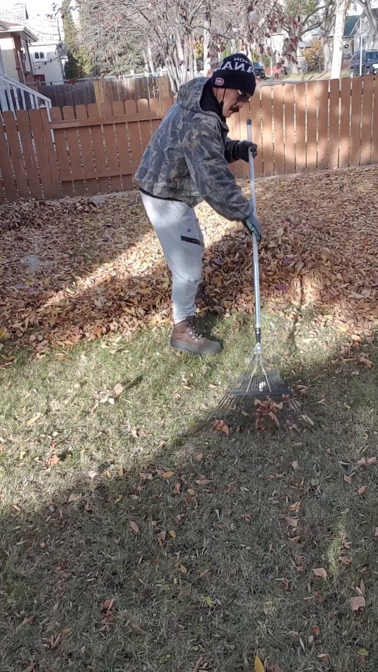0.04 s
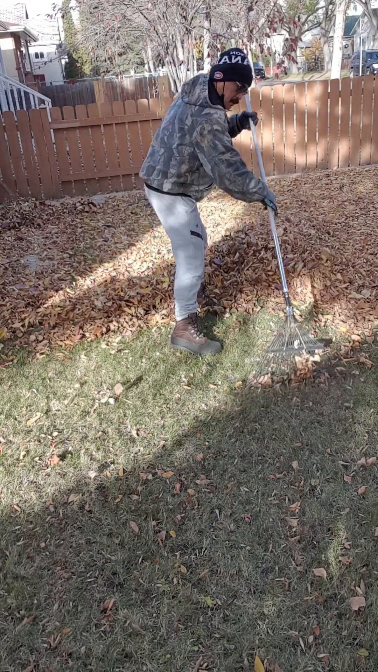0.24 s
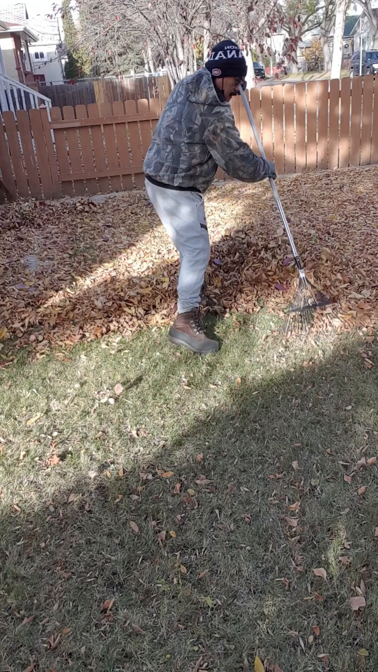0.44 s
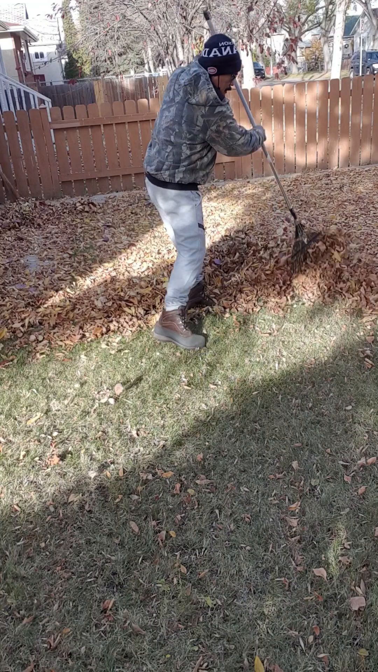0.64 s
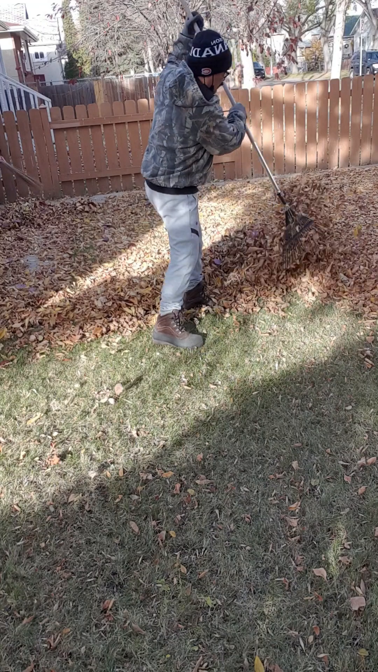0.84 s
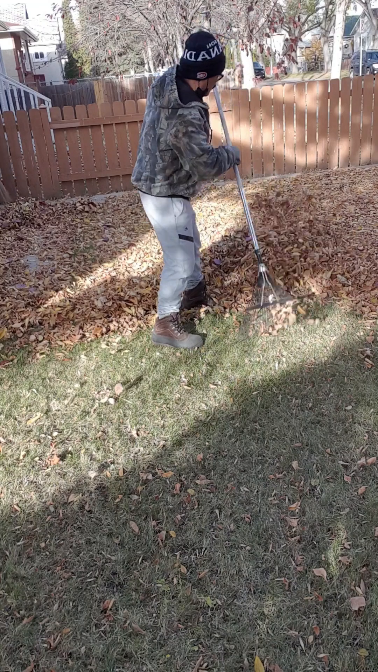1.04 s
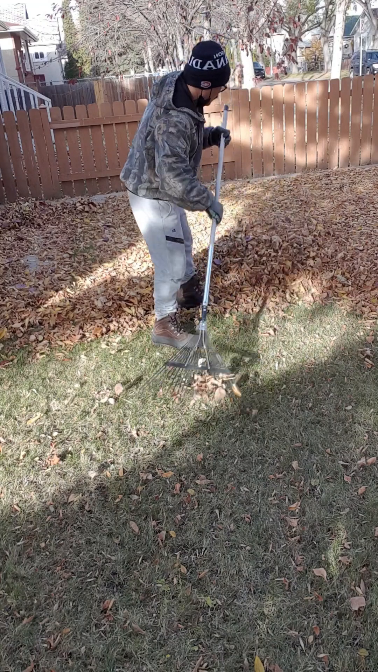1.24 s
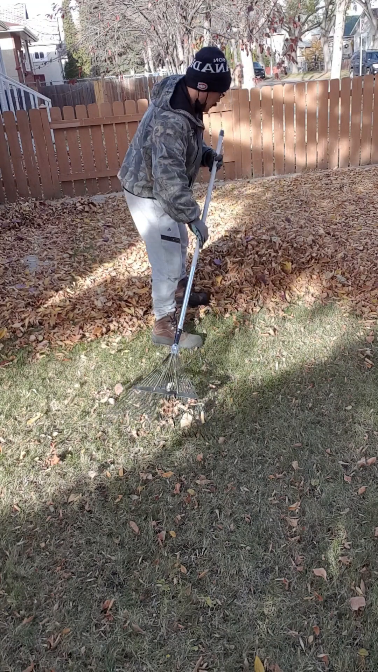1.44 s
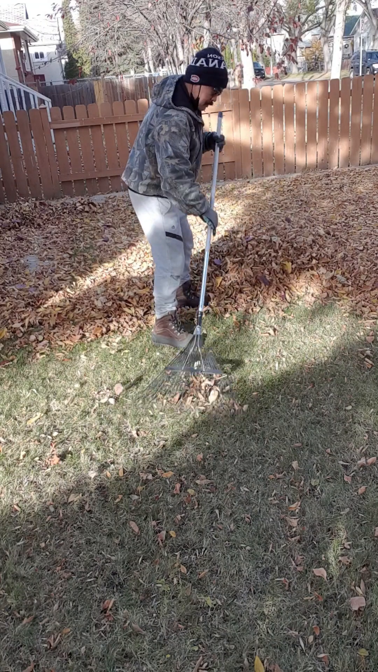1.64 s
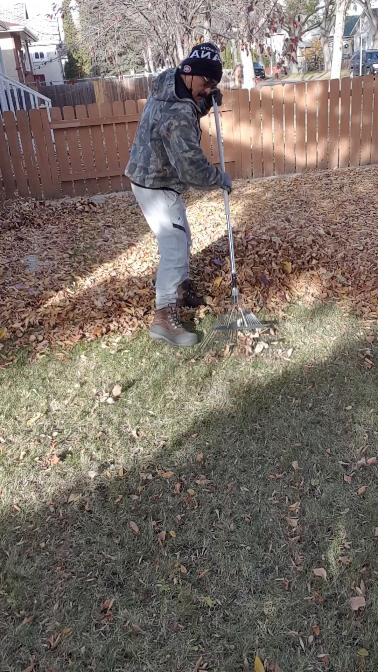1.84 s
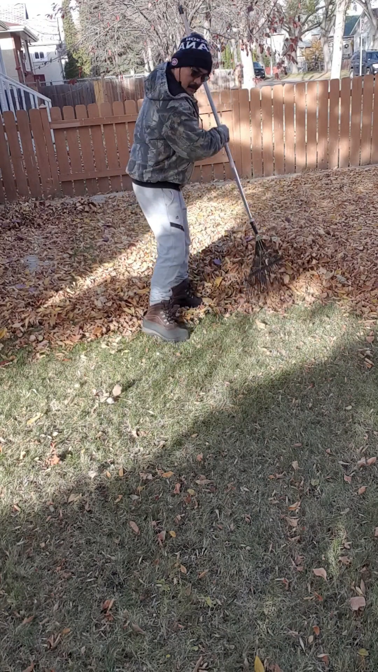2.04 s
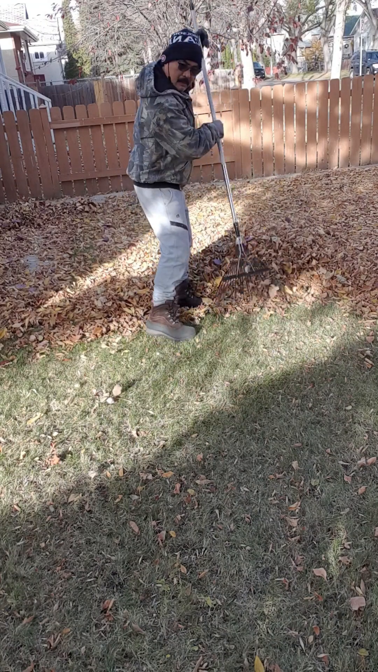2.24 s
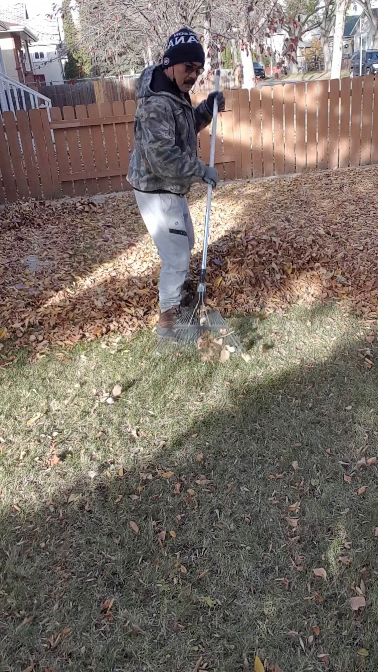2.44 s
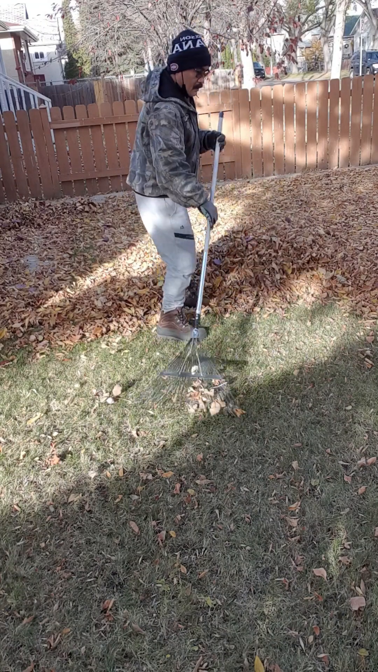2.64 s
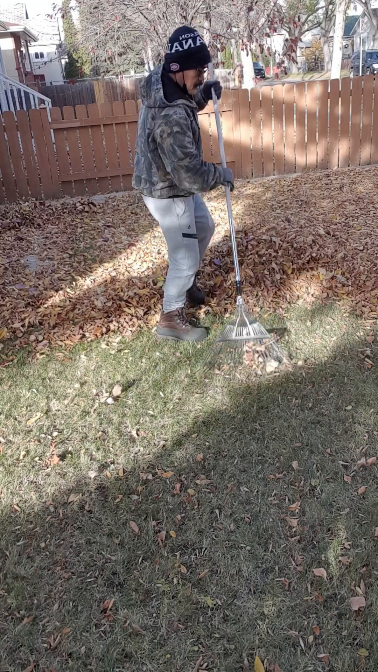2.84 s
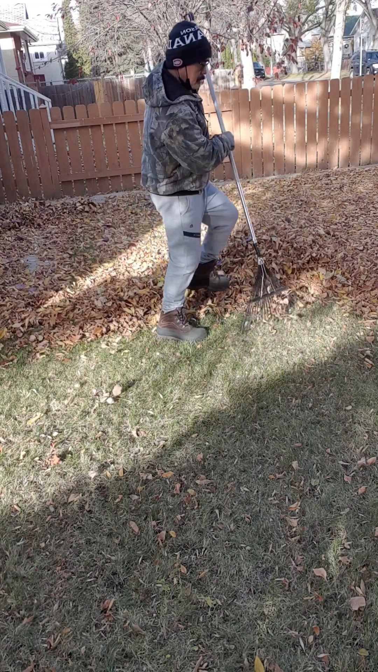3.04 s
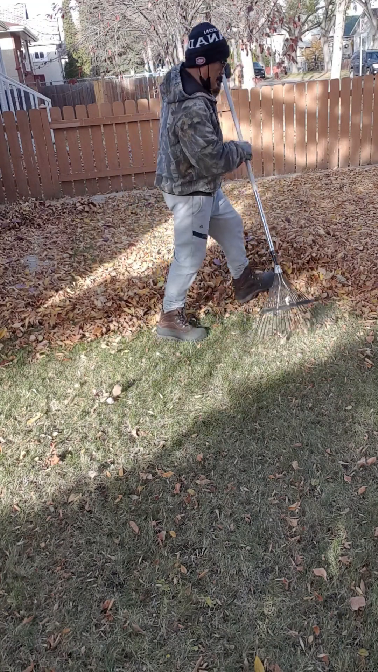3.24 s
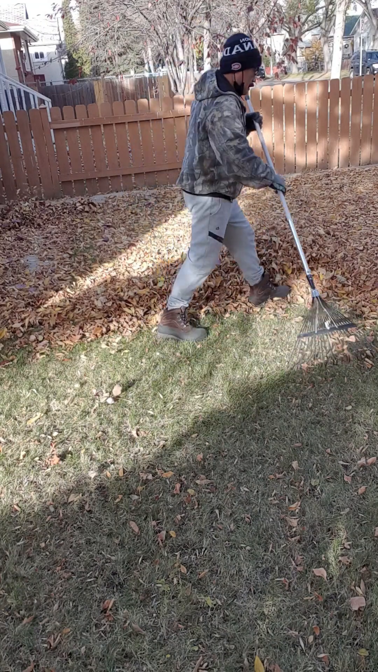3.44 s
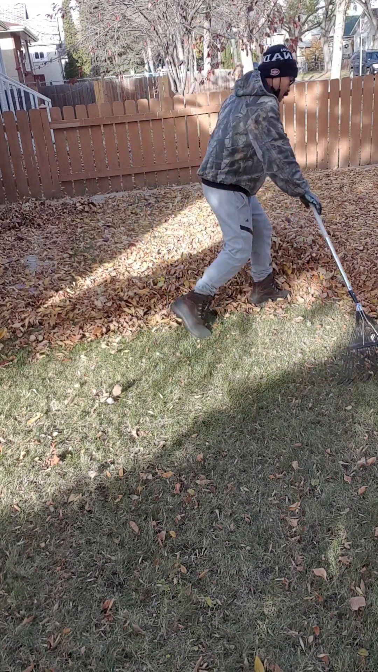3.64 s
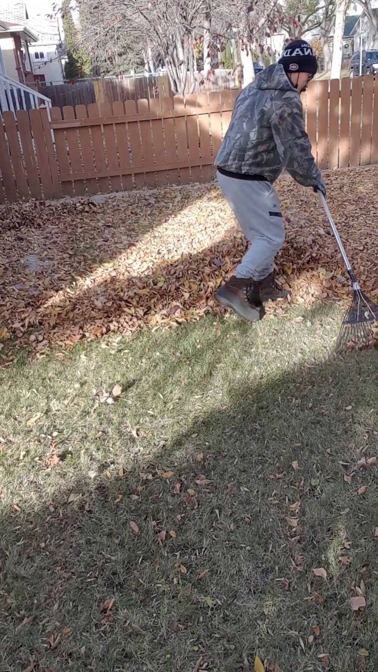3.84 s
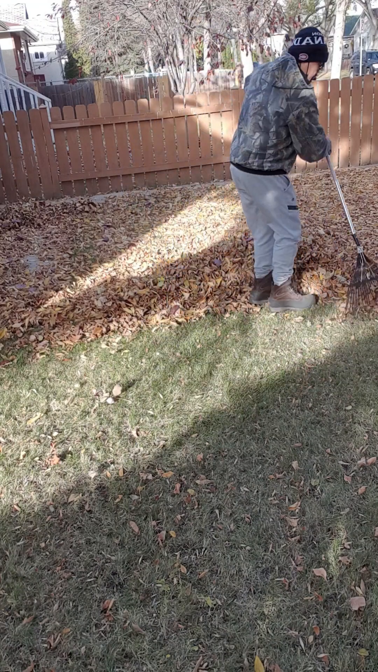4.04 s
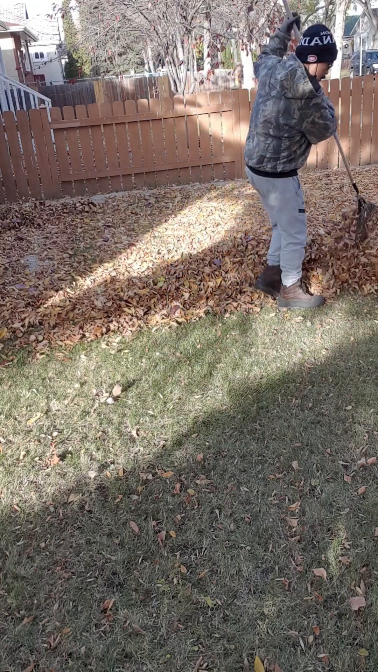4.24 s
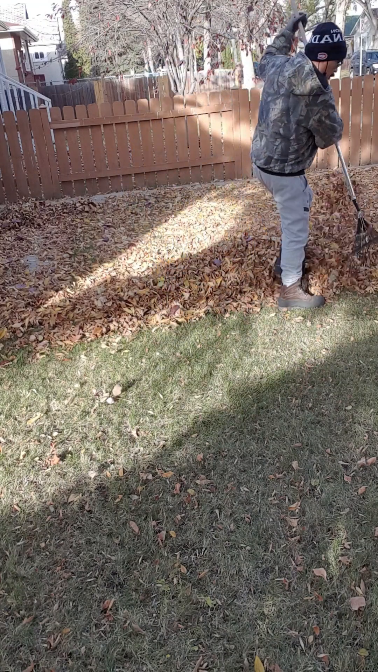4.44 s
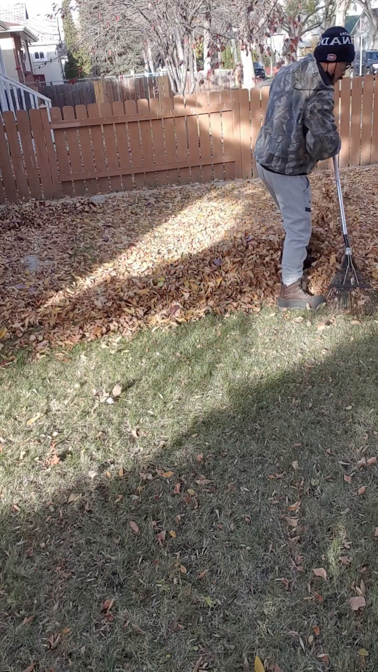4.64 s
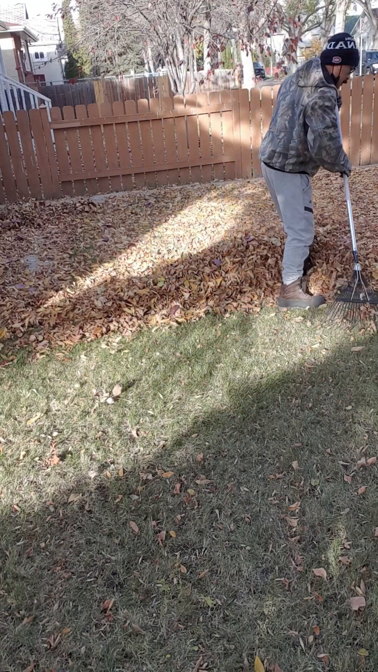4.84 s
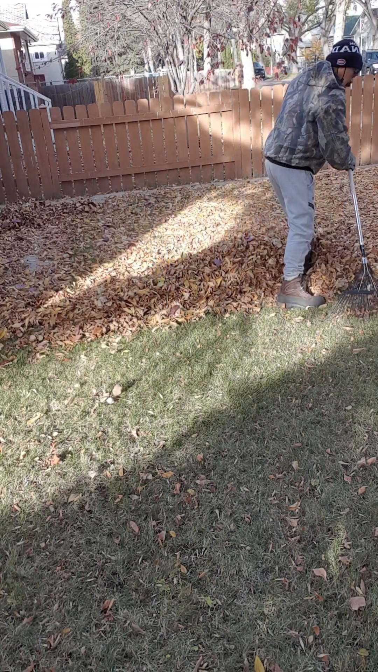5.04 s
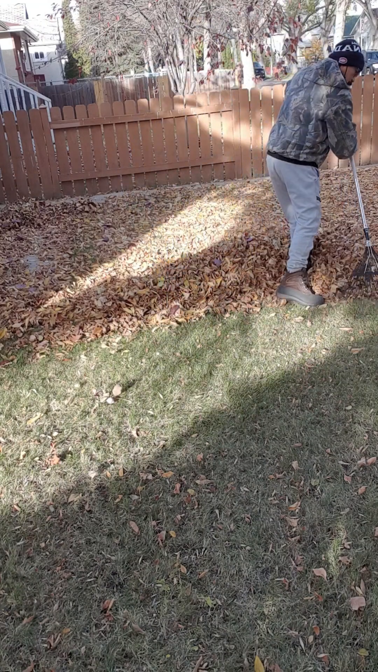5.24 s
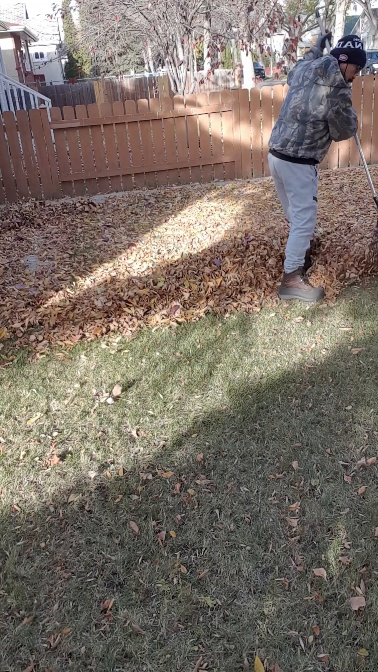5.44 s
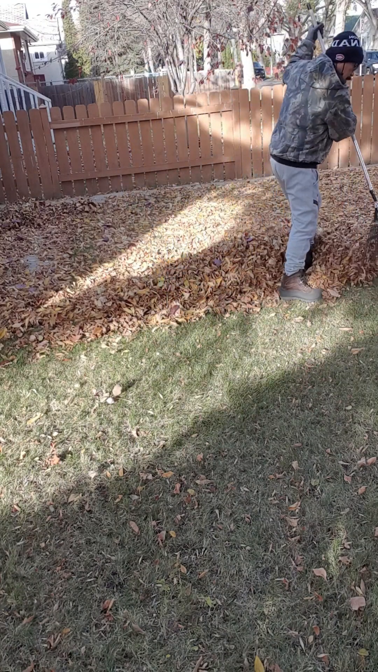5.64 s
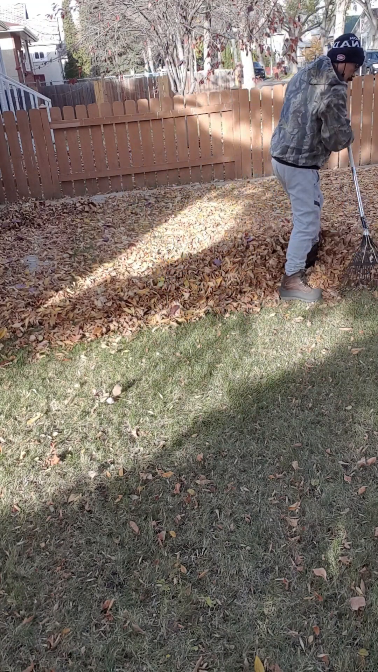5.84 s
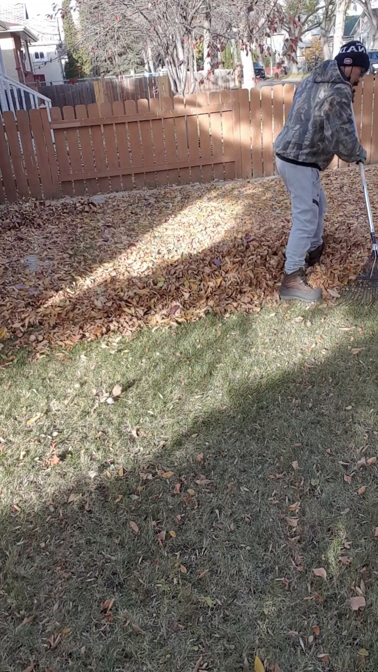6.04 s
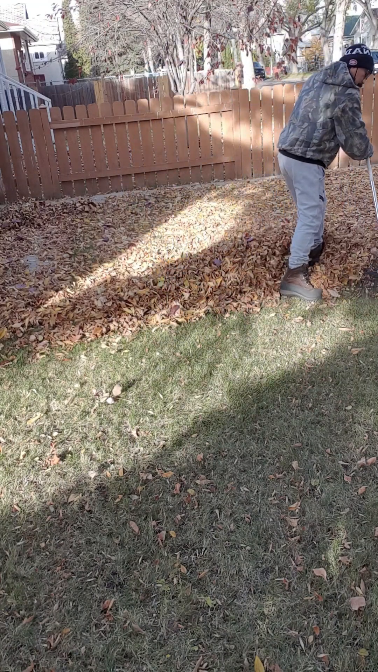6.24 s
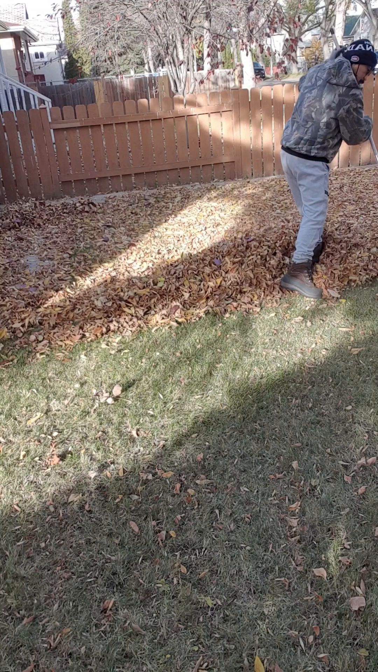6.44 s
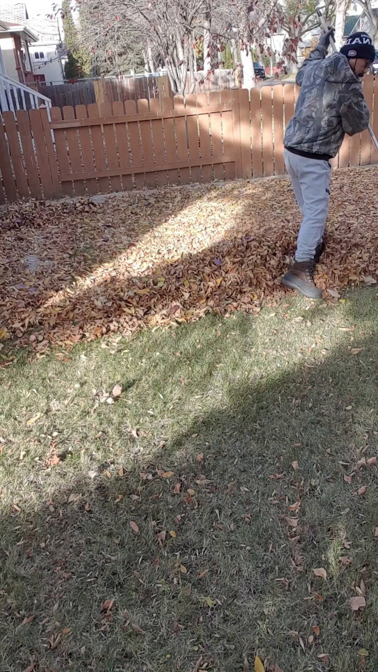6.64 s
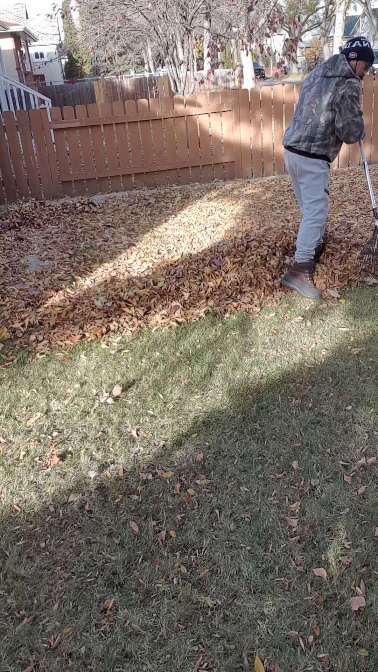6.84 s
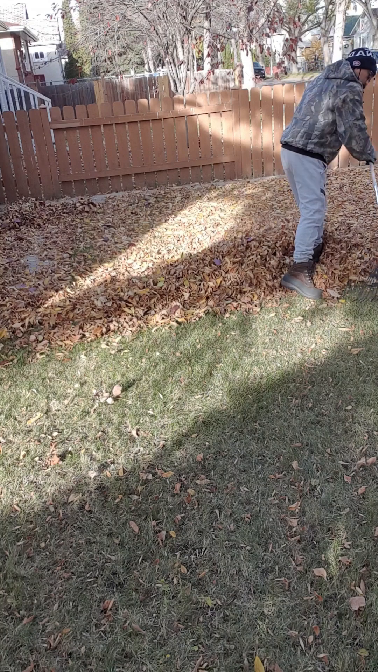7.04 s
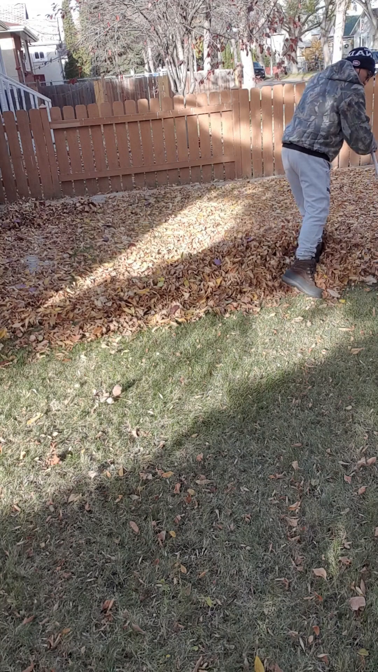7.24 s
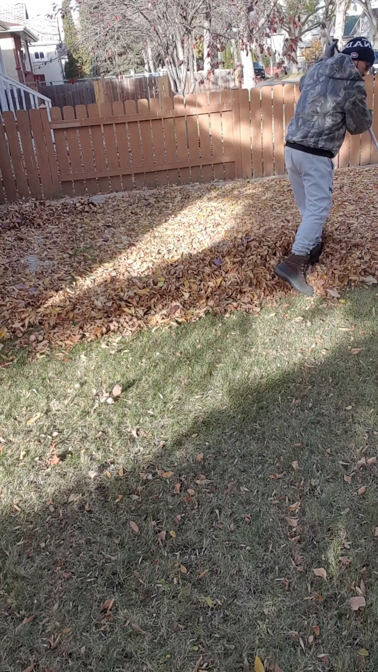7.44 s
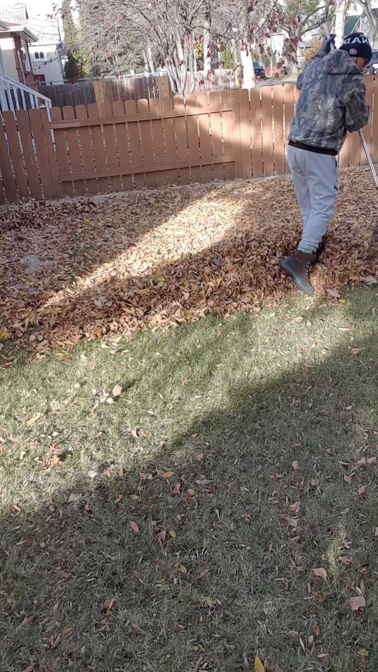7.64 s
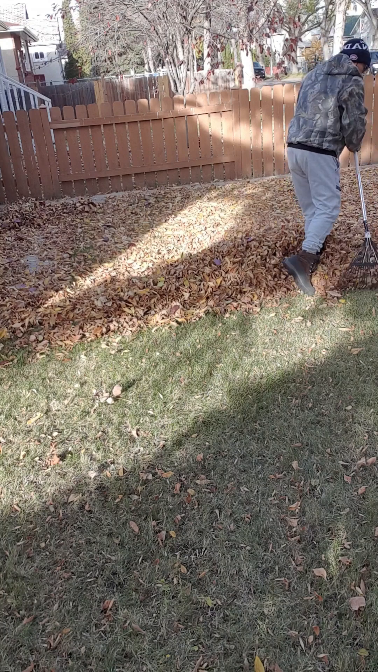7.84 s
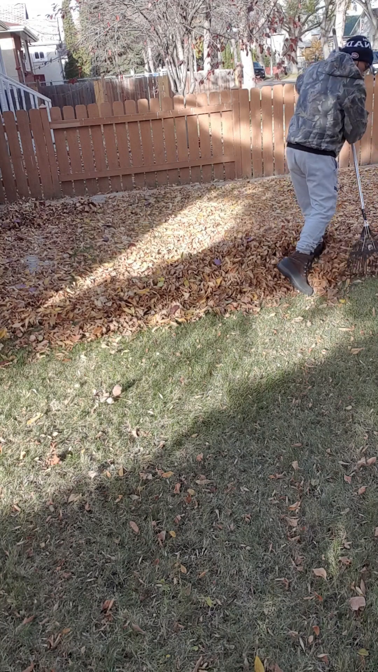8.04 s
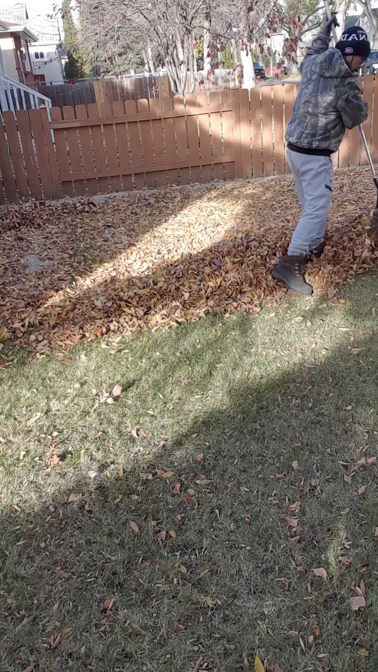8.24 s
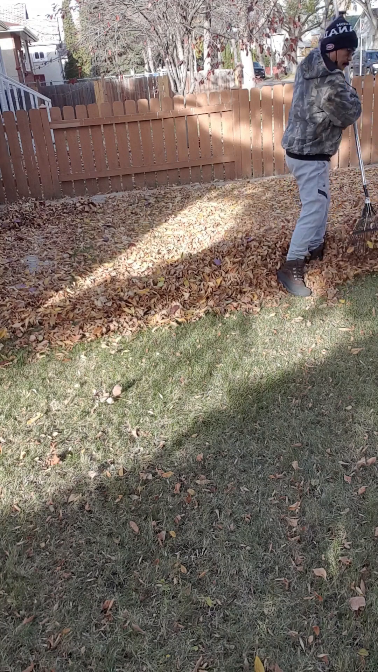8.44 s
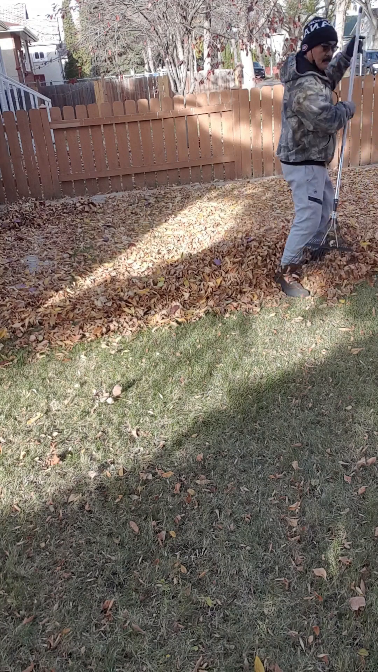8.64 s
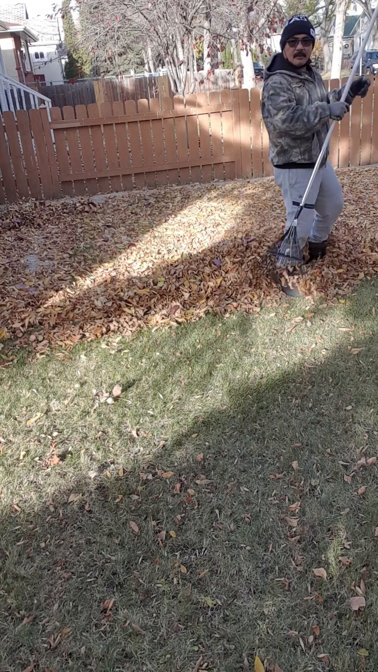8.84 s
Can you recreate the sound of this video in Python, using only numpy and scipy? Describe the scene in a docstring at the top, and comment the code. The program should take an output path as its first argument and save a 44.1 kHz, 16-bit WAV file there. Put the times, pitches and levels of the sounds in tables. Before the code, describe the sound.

A rake bites at once into brittle leaves on a lawn, and the strokes continue to the end. Bright crackling swishes swell and fade, the biggest early and again just before the middle. Springy tines snap and the rake knocks lightly on the turf. Later strokes are shorter and closer together. Distant low rumble and faint open air sit underneath, heard by a stereo microphone nearby with little echo.

```python
"""A dry rustle bites in at once: a fan rake dragged again and again through brittle leaves on a lawn.
Each stroke is shaped noise, random snaps and ringing stalks; loose leaves swell and settle between strokes.
Tines flick with noise cracks and sprays, and knocks ring the rake's decaying modes.
A low rumble of noise and a wavering drone lies far behind, with faint outdoor air."""
import sys
import numpy as np
from scipy import signal
from scipy.fft import rfft, irfft
from scipy.io import wavfile
from scipy.ndimage import uniform_filter1d, map_coordinates

SR = 44100
rng = np.random.default_rng(int(sys.argv[2]) if len(sys.argv) > 2 else 0)


def store_wav(level_fs):
    """Save 16-bit WAV to argv[1]."""
    pcm = np.round(np.clip(np.atleast_2d(level_fs), -1, 1) * 32767)
    wavfile.write(sys.argv[1], SR, pcm.T.astype(np.int16))


N = 392490


def from_db(db):
    """Decibels to gain."""
    return 10 ** (np.asarray(db) / 20)


def rms_one(x):
    """Scale to rms 1."""
    return x / np.sqrt(np.mean(x ** 2) + 1e-20)


def in_time(rows):
    """Draw the columns of a curve, first column time, at every sample."""
    s, *columns = np.transpose(rows)
    return [np.interp(np.arange(N) / SR, s, column) for column in columns]


def colour(x, points, size=8192):
    """Causal (minimum-phase) filter with the given spectrum."""
    hz, db = np.transpose(points)
    grid = np.maximum(np.fft.rfftfreq(size, 1 / SR), 1)
    gain = from_db(np.interp(np.log(grid), np.log(hz), db))
    # folding the cepstrum onto positive time gives minimum phase
    cepstrum = irfft(np.log(gain))
    cepstrum[1:size // 2] *= 2
    cepstrum[size // 2 + 1:] = 0
    impulse = irfft(np.exp(rfft(cepstrum)))
    return signal.oaconvolve(x, impulse[None], axes=-1)[:, :N]


def drift(rate):
    """Smooth chance that heads for a new value rate times a second; rms 1."""
    knots = rng.standard_normal(N // 16)
    return rms_one(np.interp(np.arange(N) / SR * rate, np.arange(len(knots)), knots))


def white_pair(direct):
    """White stereo noise: a direct share of power is alike on both sides, ground and fence scatter the rest."""
    alike = np.sqrt(direct) * rng.standard_normal(N)
    return alike + np.sqrt(1 - direct) * rng.standard_normal((2, N))


def fade(clicks, t60):
    """Every click of energy dies away exponentially, by 60 dB in t60 seconds."""
    return signal.lfilter([1], [1, -from_db(-120 / (t60 * SR))], clicks + 1e-18)


def ring(drive, hz, t60):
    """A damped resonance: a unit click sets a decaying sine of height about 1 ringing."""
    radius, angle = from_db(-60 / (t60 * SR)), 2 * np.pi * hz / SR
    feedback = [1, -2 * radius * np.cos(angle), radius * radius]
    return signal.lfilter([0, np.sin(angle)], feedback, drive + 1e-18)


def snaps(per_s, spread_db, t60, largest=1.9):
    """Energy of leaves breaking at random: many tiny snaps and a few large ones; mean 1."""
    born = rng.random(N) < per_s / SR
    sizes = from_db(spread_db * np.minimum(rng.exponential(1, N), largest))
    energy = fade(born * sizes ** 2 / per_s, t60)
    return energy / energy.mean()


def grains(energy, spectrum, sliding, direct):
    """Snaps as tiny noise bursts over a smooth share of leaves sliding on each other; rms 1."""
    envelope = np.sqrt(sliding + (1 - sliding) * energy)
    return rms_one(colour(envelope * white_pair(direct), spectrum))


# colour of the outdoor air: (frequency [Hz], relative level [dB per Hz])
AIR_COLOUR = [(100, 12), (300, -4.5), (700, -10), (1300, -37), (3000, -13), (8000, -2.5), (16000, -12)]


def air():
    """Faint, constant outdoor air: coloured noise about half alike on both sides."""
    return from_db(-48.5) * rms_one(colour(white_pair(direct=0.52), AIR_COLOUR))


# level of the rumble, with one sudden drop: (time [s], level before trim [dB])
RUMBLE_LEVEL = [(0.0, -32), (0.25, -29), (0.88, -34), (1.02, -32.5), (1.6, -31), (1.96, -33.5), (2.2, -33),
                (3.3, -31.5), (4.2, -33), (4.98, -32), (5.06, -42.5), (5.75, -40.5), (6.1, -37), (6.8, -35),
                (7.25, -36), (8.0, -32.5), (8.9, -32.5)]
# colour of the rumble's noise: (frequency [Hz], relative level [dB per Hz])
RUMBLE_SPECTRUM = [(20, -24), (33, -25), (45, -6), (57, -2.5), (70, -1), (86, -3.5), (112, -4),
                   (140, -13.5), (200, -17), (300, -21), (500, -28.5), (900, -34), (2000, -59.5)]


def rumble(drone_hz=58, waver_hz=5, drone_db=-6, trim_db=0.86):
    """Far traffic: low noise around a wavering drone; its level as heard varies and once drops abruptly."""
    level_db, = in_time(RUMBLE_LEVEL)
    noise = rms_one(colour(white_pair(direct=0.98), RUMBLE_SPECTRUM))
    pitch_hz = drone_hz + waver_hz * drift(19)
    drone = rms_one(np.sin(2 * np.pi * np.cumsum(pitch_hz) / SR))
    low = noise + from_db(drone_db) * drone
    # it throbs quickly, but is evened out over a quarter of a second
    power = uniform_filter1d(np.mean(low ** 2, axis=0), SR // 4)
    even = low / np.sqrt(power + .1)
    return from_db(level_db + trim_db) * rms_one(even)


# knocks of the rake, dull ones on the turf:
# (time [s], relative strength [dB], tilt about 1 kHz [dB per octave])
KNOCK_HITS = [(1.655, -23, -7.5), (1.867, -24.5, -7), (2.255, -35, 9.5), (2.845, -19, 0), (2.902, -19, 3),
              (5.1421, -19.5, 2), (5.163, -24, 2.5), (6.161, -24, 5.5), (6.178, -30, 6), (6.332, -23, 2),
              (6.346, -23, 6), (7.113, -27, 0.5), (7.305, -27, -7), (7.322, -27, -5), (7.85, -29.5, 2.5)]
# resonances of the rake: (frequency [Hz], relative level [dB], decay t60 [s])
RAKE_RESONANCES = [(290, -20.5, 0.047), (380, -10.5, 0.049), (675, -12.5, 0.071), (787, -14, 0.11),
                   (1060, -3, 0.014), (1430, -6, 0.015), (2110, -2, 0.0082), (2900, -4, 0.0061),
                   (4600, -2, .004)]


def knocks(rattle_t60=0.17, rattle_db=-31):
    """Each knock and the brief rattle after it ring the rake's modes; a soft contact favours the low ones."""
    s, strength_db, tilt_db = np.transpose(KNOCK_HITS)
    chance = rng.standard_normal((len(KNOCK_HITS), len(RAKE_RESONANCES)))
    out = np.zeros(N)
    for k, (hz, mode_db, t60) in enumerate(RAKE_RESONANCES):
        blow_db = strength_db + mode_db + tilt_db * np.log2(hz / 1000) + 2 * chance[:, k]
        blows = np.zeros(N)
        blows[(s * SR).astype(int)] = from_db(blow_db)
        shaking = np.sqrt(fade(blows ** 2, rattle_t60))
        rattle = from_db(rattle_db) * shaking * rng.standard_normal(N)
        out += ring(blows + rattle, hz, t60)
    return out / 2


# tines that catch and flick:
# (time [s], relative crack level [dB], relative spray level [dB], spray decay t60 [s])
TINE_FLICKS = [(0.115, -3, -20, 0.14), (0.4115, -1, -12, 0.046), (1.7786, 4, -17, 0.043),
               (1.901, -11, -11, 0.066), (1.926, 1, -20, 0.055), (2.004, -4.5, -9.5, 0.13),
               (2.8389, -19.5, -37, 0.062), (2.9024, -3.5, -16, .07), (2.965, -12, -13, 0.075),
               (2.9745, 4, -8, 0.055), (2.978, 2, -8.5, 0.067), (3.6857, -13, -25, 0.084),
               (3.7475, -13, -18.5, 0.075), (3.8566, -13, -15.5, 0.12), (5.008, -6, -21, 0.095),
               (5.015, -2, -12.5, 0.063), (5.2703, -12, -20, 0.053), (5.2751, 13, -9, 0.12),
               (6.216, -9, -11.5, 0.093), (6.227, -22, -13, 0.14), (7.1122, -25, -26, 0.24),
               (7.131, -22, -23, 0.19), (7.925, -25.5, -25, 0.14)]
# colour of crack and spray: (frequency [Hz], relative level [dB per Hz])
FLICK_COLOUR = [(300, -8), (1200, -12), (3000, -3), (6000, 1), (11000, 6), (16000, 3.5)]


def flicks(level_db=-5.5):
    """A tine springs free with a sharp crack and sets off a short spray of snaps."""
    cracks, spray = np.zeros(N), np.zeros(N)
    for s, crack_db, spray_db, t60 in TINE_FLICKS:
        at = int(s * SR)
        cracks[at] += from_db(crack_db) ** 2
        age = np.arange(N - at)[:SR // 2] / SR
        onset = 1 - np.exp(-age / .0015)
        spray[at:at + len(age)] += from_db(spray_db - 60 * age / t60) ** 2 * onset
    # half the spray is smooth, half breaks into snaps
    snapping = (1 + snaps(2500, spread_db=2.5, t60=.003)) / 2
    energy = fade(cracks, t60=.0013) + spray * snapping
    return from_db(level_db) * colour(np.sqrt(energy) * white_pair(direct=0.68), FLICK_COLOUR)


# loose leaves shoved, tossed or settling, and a dull footstep at 3.52 s; rise and fall each span 10 dB: #
# (fullest time [s], rustle level [dB], rise [s], fall [s], # bulk re rustle [dB], crispness re rustle [dB])
LEAF_SWELLS = [(0.07, -41, 0.079, 0.12, -4, 10.5), (0.68, -24, 0.2, 0.15, -7.5, 1.5),
               (0.97, -41, 0.151, 0.21, -3, 3), (1.24, -37.5, 0.25, 0.26, -7.5, 1.5),
               (2.2, -40.5, 0.15, 0.2, -7, 2.5), (2.501, -40.5, 0.1, 0.16, -10, 7),
               (3.14, -40, 0.1, 0.32, -9.5, 7.5), (3.39, -39, 0.19, 0.21, -8, 3.5),
               (3.52, -43, 0.062, 0.058, 1.5, -12.5), (3.74, -40, 0.054, 0.14, -11, 10),
               (4.16, -23, 0.16, 0.16, -9, -1), (4.42, -34.5, 0.14, 0.35, -10.5, 0.5),
               (4.77, -34, 0.33, 0.27, -6, 2), (5.43, -35, 0.13, 0.2, -14, -2),
               (5.88, -42.5, 0.19, 0.18, -3, 0), (6.479, -32, 0.16, 0.19, -12.5, 0.5),
               (6.88, -46.5, 0.237, 0.19, -24, 3), (7.4, -30, 0.12, 0.21, -10.5, 1),
               (7.76, -36.5, 0.0774, 0.22, -11, 0.5), (8.08, -28, 0.11, 0.19, -13.5, 2.5),
               (8.39, -36, 0.11, 0.16, -9.5, 1), (8.62, -38.5, 0.14, 0.17, -6.5, 1),
               (8.9, -37.5, 0.055, 0.046, 1, -3)]
SWELL_ROUNDNESS = 1.5   # 1 is a pointed top, 2 a bell


def swells(t):
    """Loose leaves start to move and come to rest, and one footstep lands: (rustle gain, bulk dB, crispness dB)
    of each swell."""
    for fullest, db, rise, fall, bulk_db, crisp_db in LEAF_SWELLS:
        away = np.maximum((fullest - t) / rise, (t - fullest) / fall)
        yield from_db(db - 10 * away ** SWELL_ROUNDNESS), bulk_db, crisp_db


# pulls of the rake over the lawn:
# (full bite time [s], length [s], rustle level [dB], growth over the pull [dB],
#  bulk re rustle [dB], crispness re rustle [dB], delay of the right microphone where it lands [ms])
RAKE_PULLS = [(0.129, 0.49, -31.5, 1.5, -5.5, 7.5, -0.064), (1.65, 0.33, -35, 6.5, -5.5, 5.5, -0.071),
              (2.835, 0.14, -32.5, 0, -5, 7, -0.065), (3.881, 0.25, -34.5, 6, -6, 6, 0.0039),
              (5.124, 0.33, -41, 2, -4, 3.5, 0.05), (6.202, 0.28, -35.5, 0, -6, 2, 0.051),
              (7.218, 0.13, -35, 5, -7.5, 2, 0.051), (8.046, 0.16, -32, 0, -5.5, -12, 0.065)]
PULL_ATTACK_DB_PER_S, PULL_RELEASE_DB_PER_S = 260, 110


def pulls(t):
    """Tines bite, gather leaves and lift off: (rustle gain, bulk dB, crispness dB) of each pull."""
    for start, length, db, growth_db, bulk_db, crisp_db, _ in RAKE_PULLS:
        age = t - start
        attack_db = PULL_ATTACK_DB_PER_S * np.minimum(age, 0)
        release_db = PULL_RELEASE_DB_PER_S * np.maximum(age - length, 0)
        gathered_db = growth_db * np.clip(age / length, 0, 1)
        yield from_db(db + attack_db - release_db + gathered_db), bulk_db, crisp_db


# harder stirring moves deeper layers: dB of extra bulk per dB over the usual rustle
BULK_FOLLOWS, USUAL_RUSTLE_DB = 0.12, -33


def stirring(rest_db=-62):
    """All moving leaves add in power over a faint constant rustle: rustle dB, bulk and crispness dB re it."""
    t = np.arange(0, N, 64) / SR   # a point every 64 samples is enough
    power = from_db(rest_db) ** 2
    for gain, bulk_db, crisp_db in [*pulls(t), *swells(t)]:
        power = power + (gain * from_db([[0], [bulk_db], [crisp_db]])) ** 2
    rustle_db, bulk_db, crisp_db = 10 * np.log10(power)
    deeper_db = BULK_FOLLOWS * (rustle_db - USUAL_RUSTLE_DB)
    return in_time(np.transpose([t, rustle_db, bulk_db - rustle_db + deeper_db, crisp_db - rustle_db]))


def twigs(rustle_db, per_s=70, spread_db=3.5, cycles=22, level_db=-7, count=24):
    """A twig or large curled leaf cracks at random and rings briefly, mostly lower than the stalks."""
    at = np.flatnonzero(rng.random(N) < per_s / SR)
    chance = rng.standard_normal((len(at), 3))
    sizes = from_db(rustle_db[at] + spread_db * np.minimum(rng.exponential(1, len(at)), 3))
    dealt, out = rng.integers(0, count, len(at)), np.zeros((2, N))
    for k, hz in enumerate(np.geomspace(1000, 5000, count)):
        mine, clicks = dealt == k, np.zeros((2, N))
        sides = np.sign(chance[mine, 0]) + chance[mine, 1:].T / 2
        clicks[:, at[mine]] = sizes[mine] * sides
        out += ring(clicks, hz, cycles / hz)
    return from_db(level_db) * out


def stalks(per_s, crisp_db, spread_db=2.0, t60=0.013, uneven=0.9, count=40):
    """Stalks and stiff leaves tick at one of many pitches, unevenly in the two microphones; rms 1."""
    at = np.flatnonzero(rng.random(N) < per_s / SR)
    sizes = from_db(spread_db * np.minimum(rng.exponential(1, len(at)), 5)) / np.sqrt(per_s[at])
    sides = rng.choice([-1, 1], (len(at), 1)) + uneven * rng.standard_normal((len(at), 2))
    dealt, out = rng.integers(0, count, len(at)), np.zeros((2, N))
    for k, hz in enumerate(np.linspace(2500, 15200, count)):
        mine, clicks = dealt == k, np.zeros((2, N))
        # crispness comes in from 5 kHz and is full at 10 kHz
        crispness = from_db(crisp_db[at[mine]] * np.clip(hz / 5000 - 1, 0, 1))
        clicks[:, at[mine]] = sizes[mine] * crispness * sides[mine].T
        out += ring(clicks, hz, t60 * np.sqrt(4000 / hz))   # small pieces ring higher and shorter
    return rms_one(out)


# faint song of the dragging tines: (frequency [Hz], relative level [dB], decay t60 [s])
TINE_RESONANCES = [(1850, -14, 0.12), (3140, -7, 0.041), (4620, -3, 0.075), (10300, -20, .06)]


def tines():
    """The tines sing faintly as they drag: noise friction keeps their modes ringing."""
    drag = white_pair(direct=0.19)
    song = sum(from_db(db) * ring(drag, hz, t60) for hz, db, t60 in TINE_RESONANCES)
    return from_db(-16) * rms_one(song)


# colour of the crushed bulk: (frequency [Hz], relative level [dB per Hz])
HEAP_COLOUR = [(90, -10.5), (200, -1), (350, 0.5), (600, 0.5), (1000, -0.5), (1700, 1), (2400, 1),
               (3600, -10), (7000, -59)]


def heap(breaking, per_s, bulk_db):
    """The bulk of the heap is crushed: slower, longer snaps join the quick ones in the low and mid range."""
    crushing = snaps(per_s / 2, spread_db=2.0, t60=0.007)
    return from_db(bulk_db + 0.28) * grains((crushing + breaking) / 2, HEAP_COLOUR, sliding=0.47, direct=0.88)


# colour of the sliding leaves: (frequency [Hz], relative level [dB per Hz])
RUSTLE_COLOUR = [(700, -29), (1500, -9), (2100, -5), (2700, 0), (4200, 2), (6000, -3), (8000, -12.5),
                 (11000, -3.5), (16000, -23)]


def rustle():
    """Leaves slide on each other so densely that they make a smooth noise."""
    return from_db(2.5) * rms_one(colour(white_pair(direct=0.38), RUSTLE_COLOUR))


# colour of the brittle top: (frequency [Hz], relative level [dB per Hz])
CRACKLE_COLOUR = [(1500, -23.5), (4000, -15), (6500, 2), (8500, 2.5), (11000, 0), (14000, -0.5),
                  (16000, 0.5)]


def crackle(breaking, crisp_db):
    """Brittle leaves add a bright, mostly smooth crackle that follows the crispness."""
    return from_db(crisp_db + 4.5) * grains(breaking, CRACKLE_COLOUR, sliding=0.94, direct=0.21)


def leaves():
    """A harder stroke breaks more leaves a second; they give way in clumps."""
    rustle_db, bulk_db, crisp_db = stirring()
    per_s = 1800 * from_db(.6 * (rustle_db - rustle_db.max())) + 350
    clump_db = 0.62 * drift(160)
    breaking = snaps(per_s, spread_db=2.5, t60=0.00057)
    ticks = from_db(0.5) * stalks(2 * per_s, crisp_db)
    stirred = heap(breaking, per_s, bulk_db) + rustle() + crackle(breaking, crisp_db) + ticks + tines()
    return from_db(rustle_db + clump_db) * stirred + twigs(rustle_db)


# each pull sweeps the rake sideways to the heap
HEAP_DELAY_MS, REACH_S, FOLLOW_THROUGH_S = 0.077, 0.2, 0.18


def bearing():
    """Delay of the right microphone in ms: the rake reaches out before each pull and ends it at the heap."""
    t = np.arange(N) / SR
    delay_ms = np.full(N, HEAP_DELAY_MS)
    for start, length, *_, lands_ms in RAKE_PULLS:
        turns = [start - REACH_S, start, start + length + FOLLOW_THROUGH_S]
        delay_ms += np.interp(t, turns, [0, lands_ms - HEAP_DELAY_MS, 0])
    return delay_ms


def from_rake(pair, shadow_db_per_ms=0.5):
    """The rake's bearing delays the right microphone against the left and shifts their balance."""
    delay_ms = bearing()
    right = map_coordinates(pair[1], [np.arange(N) - delay_ms * SR / 1000], order=5)
    balance_db = shadow_db_per_ms * delay_ms * [[1], [-1]]
    return np.array([pair[0], right]) * from_db(balance_db)


def scene():
    """The raking over the rumble and the faint outdoor air."""
    background = air() + rumble()
    return background + from_rake(knocks() + flicks() + leaves())


# colour of each microphone port: (frequency [Hz], gain [dB])
LEFT_PORT_COLOUR = [(100, -1.1), (400, 1), (1000, -0.9), (2200, -2.6), (2900, -2), (4600, -2), (5200, -3.5),
                    (7400, -6), (8400, -1.7), (10600, -1), (12000, -2.5), (13700, -4), (15400, -0.5)]
RIGHT_PORT_COLOUR = [(100, -1.46), (1000, 1.97), (2200, -1.4), (3000, 0), (4500, -0.3), (5900, 2.5),
                     (6800, -2), (7600, 1.5), (8600, -4.5), (9400, -3.5), (10800, -0.5), (11700, -1),
                     (13500, 3), (15400, -4.5)]
CUTOFF_HZ = 15600


def record(dry):
    """Each port colours its side, the highest peaks are rounded, and the top is cut steeply."""
    ported = np.vstack([colour(dry[:1], LEFT_PORT_COLOUR), colour(dry[1:], RIGHT_PORT_COLOUR)])
    rounded = ported / (1 + (ported / .72) ** 4) ** .25   # peaks bend towards 0.72
    steep = signal.ellip(12, .1, 80, CUTOFF_HZ, fs=SR, output="sos")
    return signal.sosfilt(steep, rounded)


dry = scene()
out = record(dry)
store_wav(out)
```